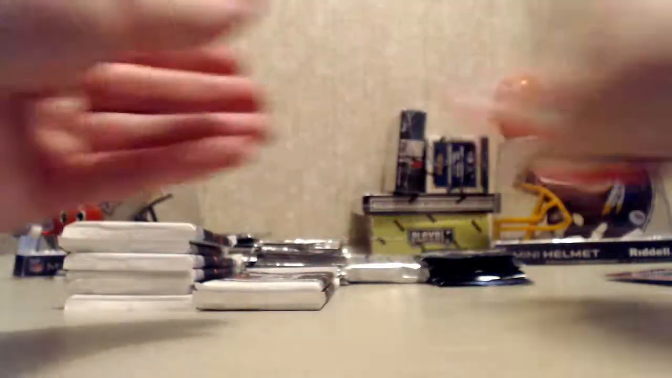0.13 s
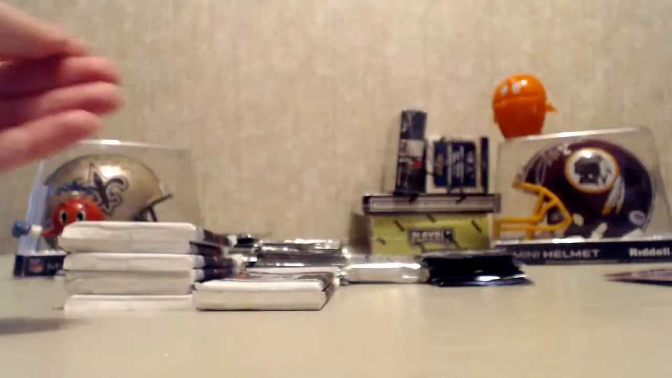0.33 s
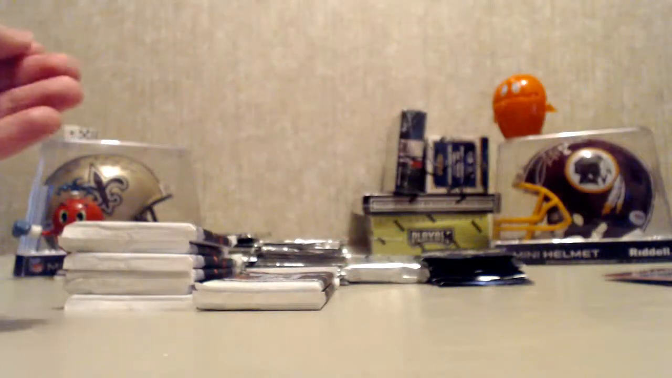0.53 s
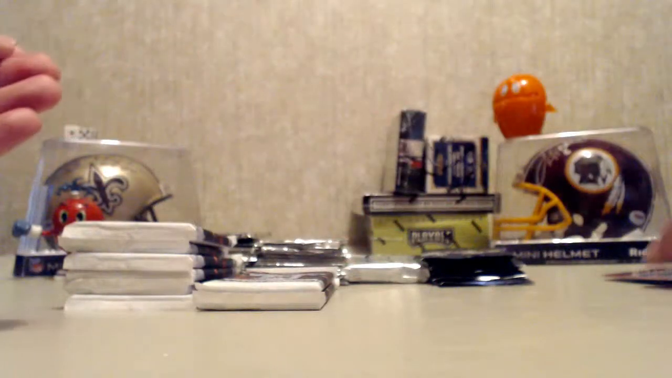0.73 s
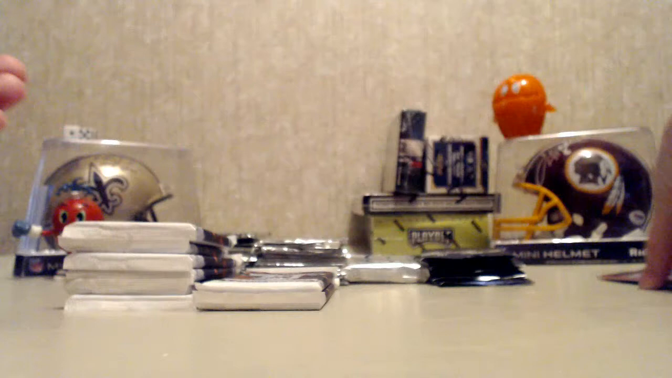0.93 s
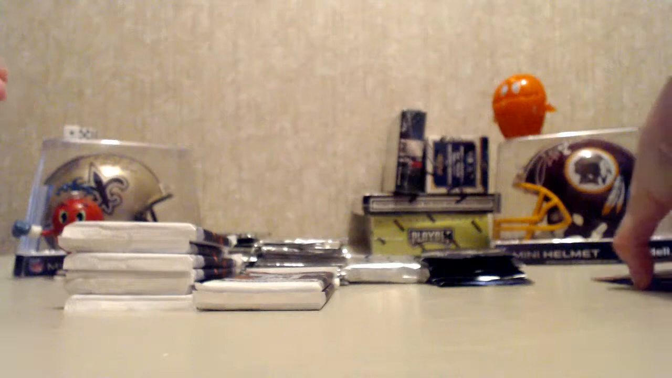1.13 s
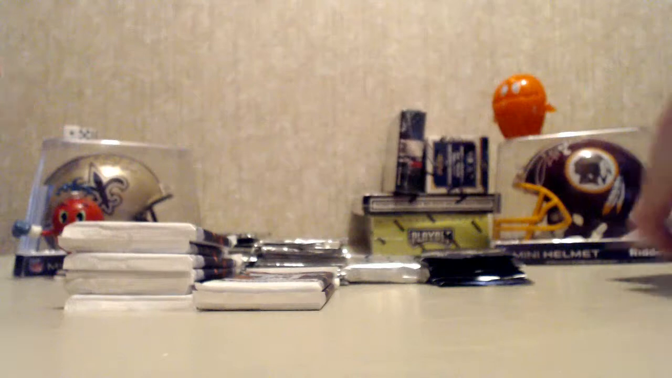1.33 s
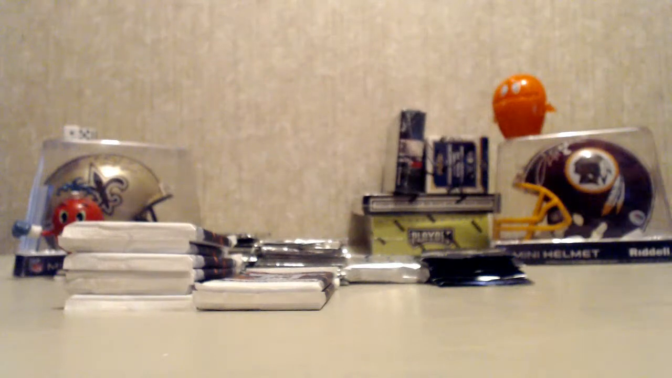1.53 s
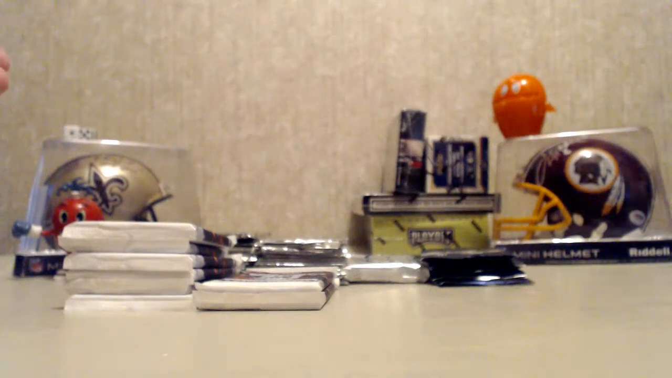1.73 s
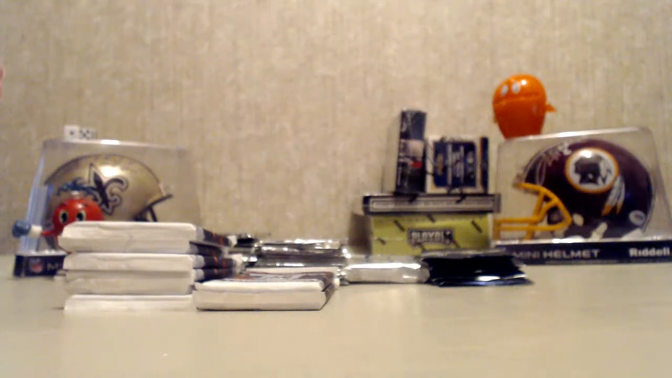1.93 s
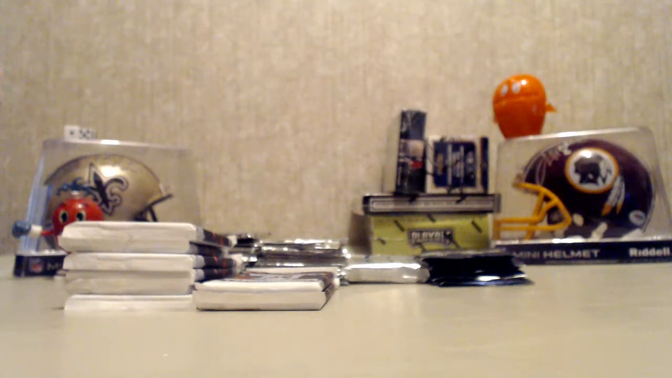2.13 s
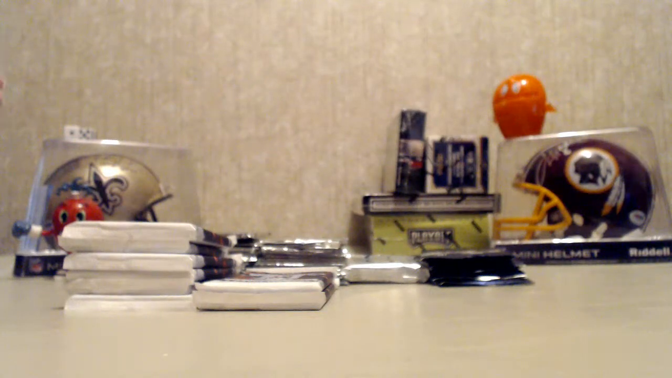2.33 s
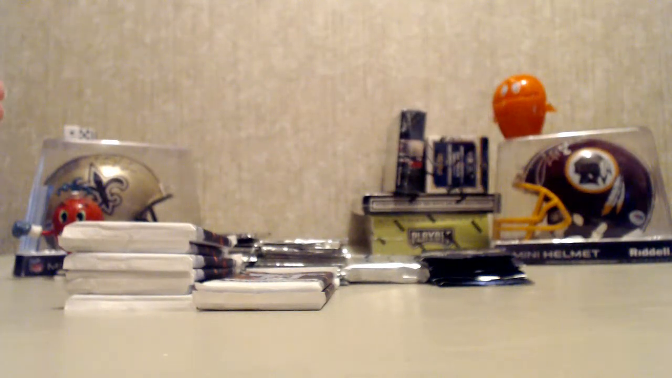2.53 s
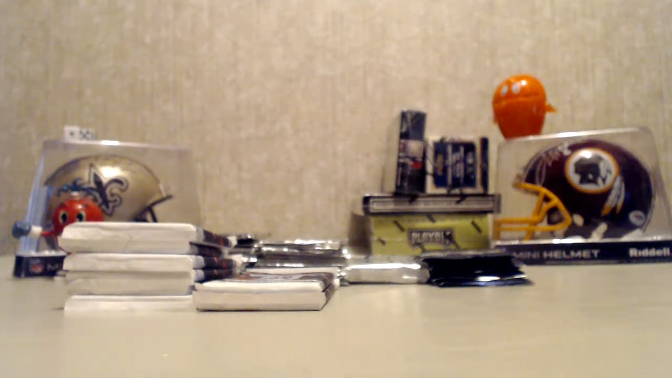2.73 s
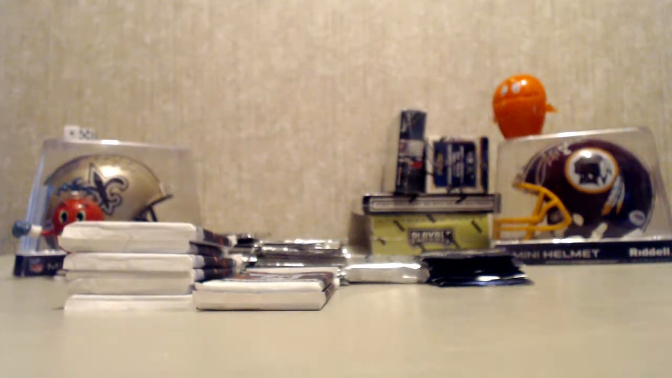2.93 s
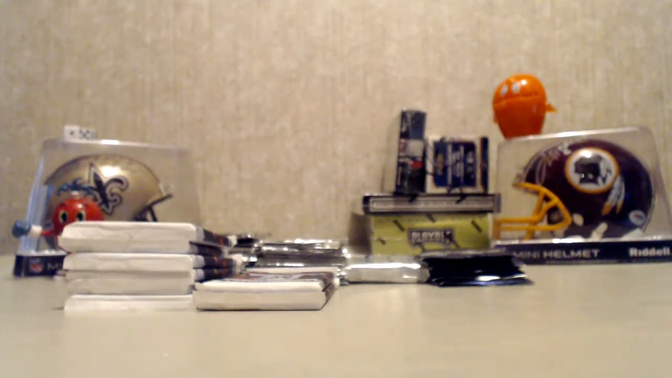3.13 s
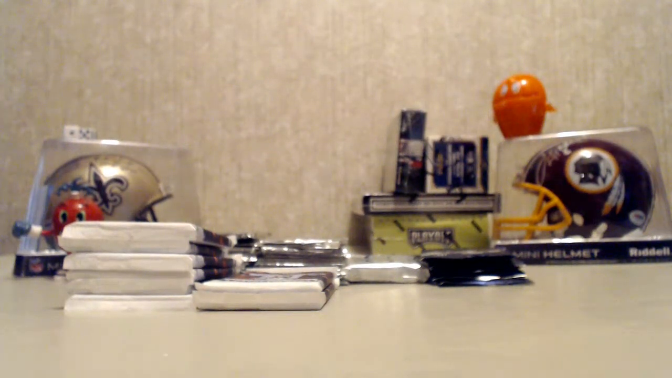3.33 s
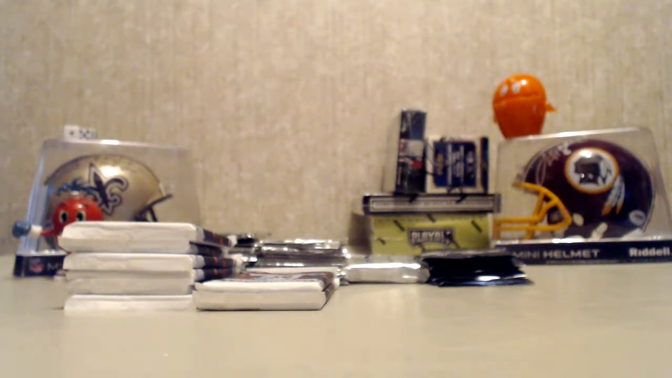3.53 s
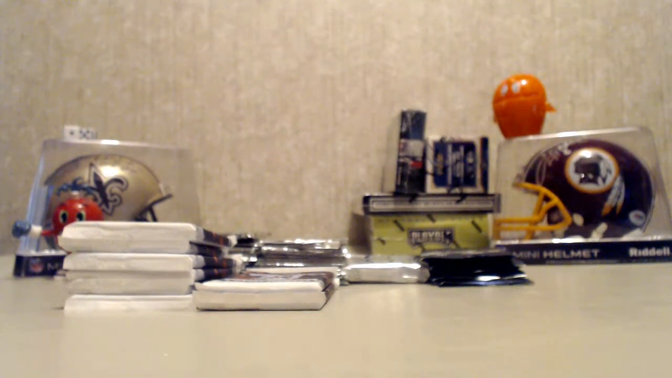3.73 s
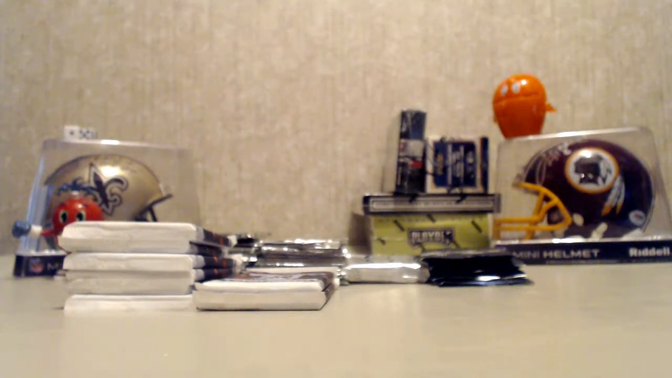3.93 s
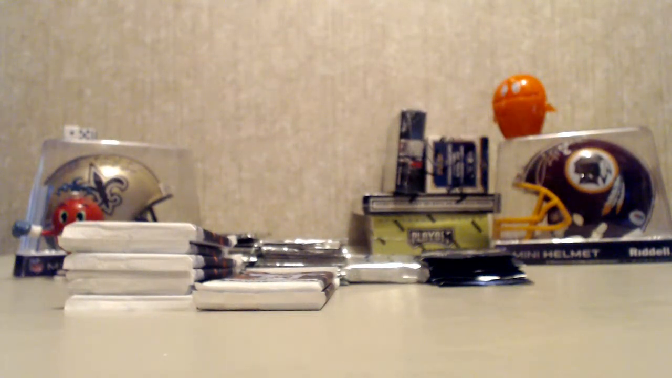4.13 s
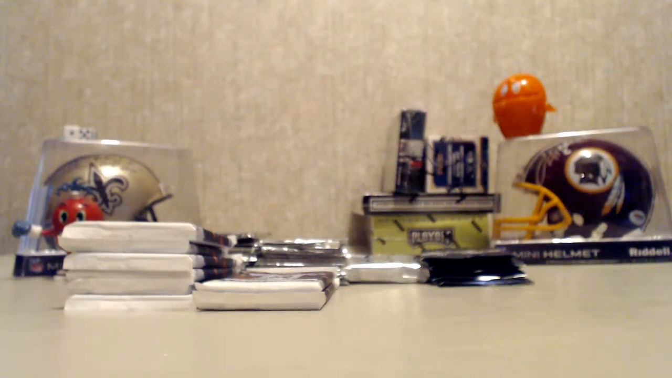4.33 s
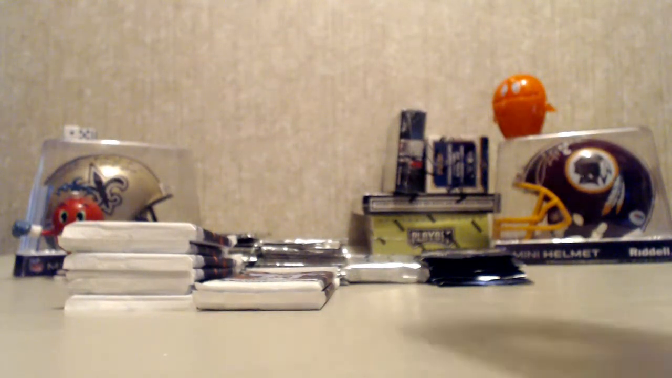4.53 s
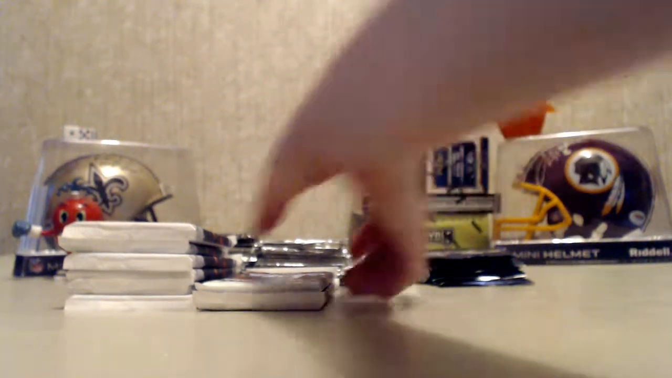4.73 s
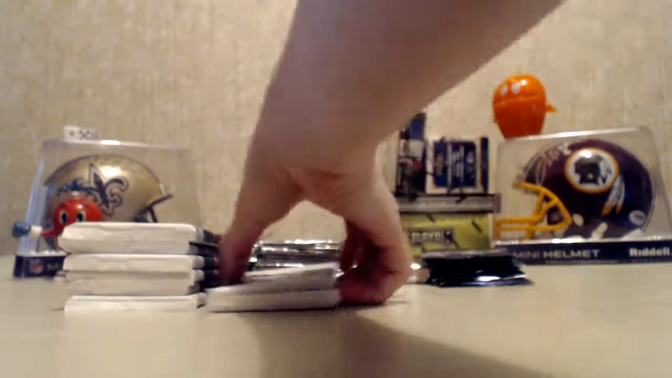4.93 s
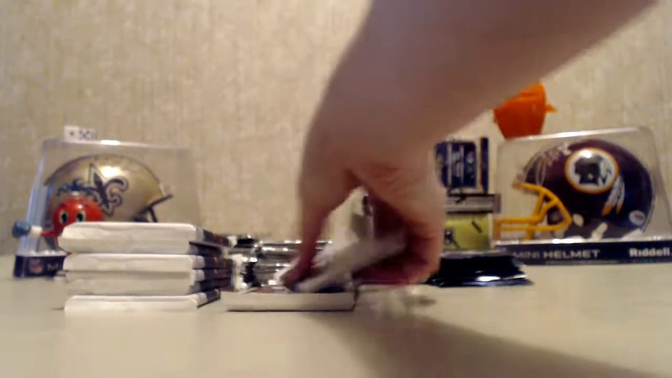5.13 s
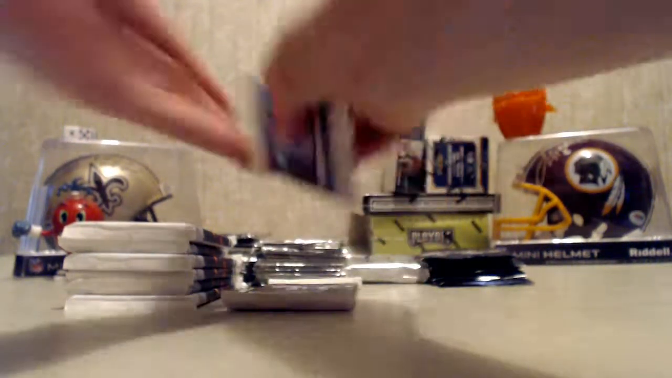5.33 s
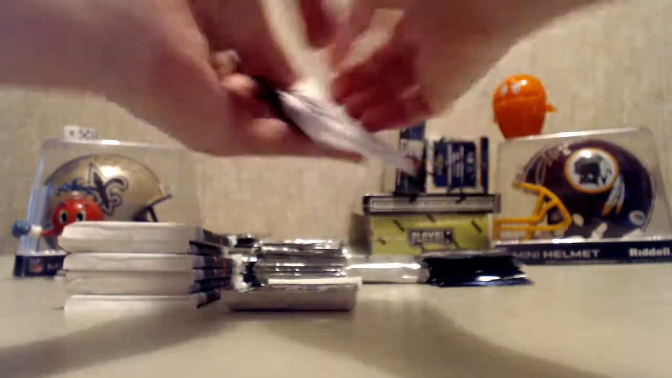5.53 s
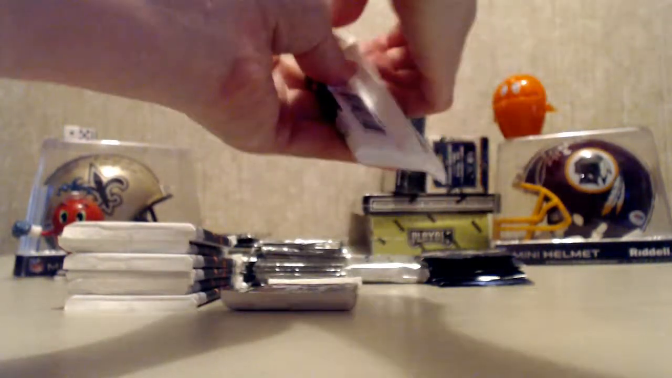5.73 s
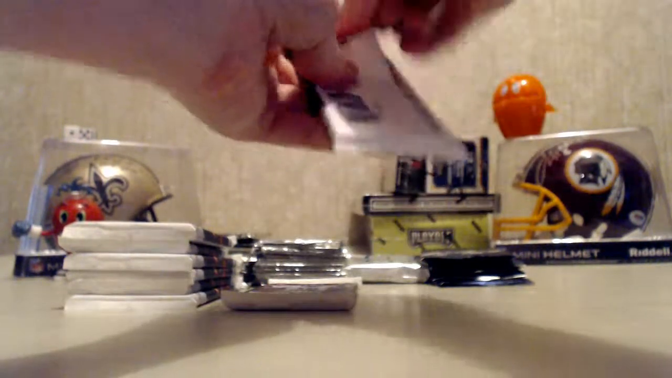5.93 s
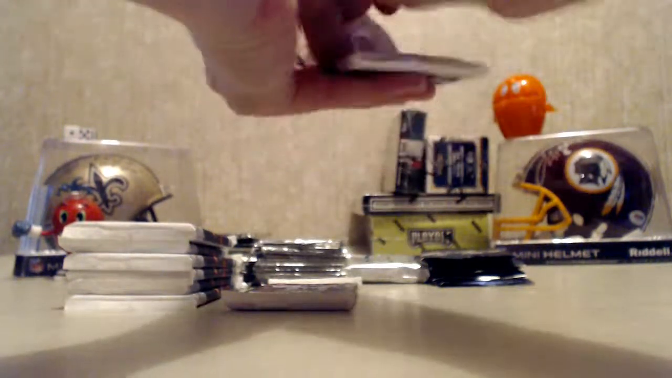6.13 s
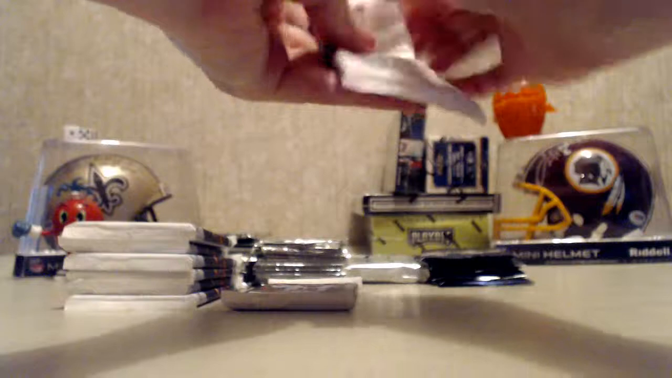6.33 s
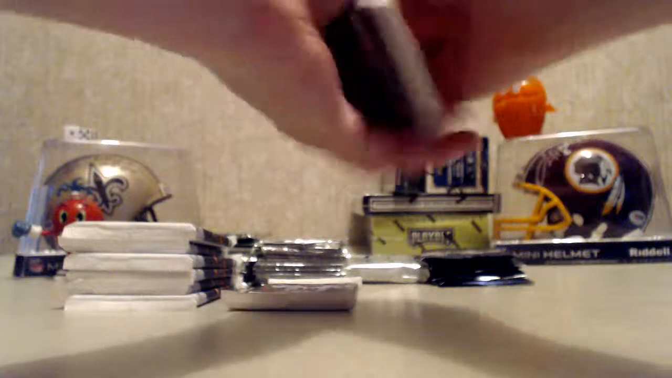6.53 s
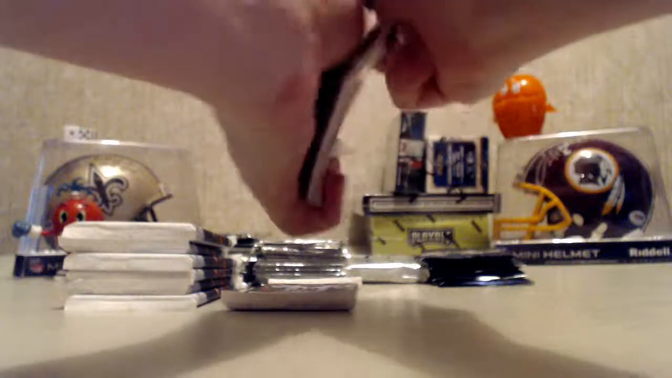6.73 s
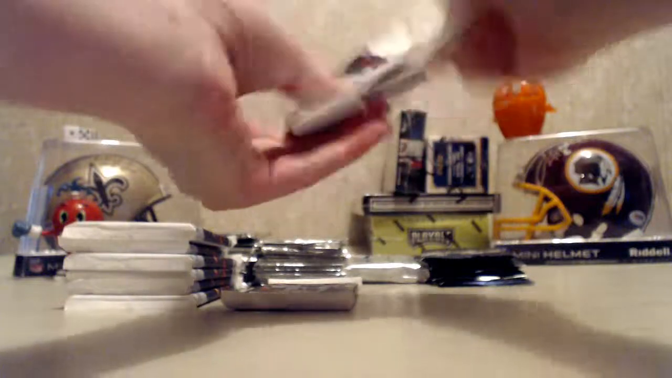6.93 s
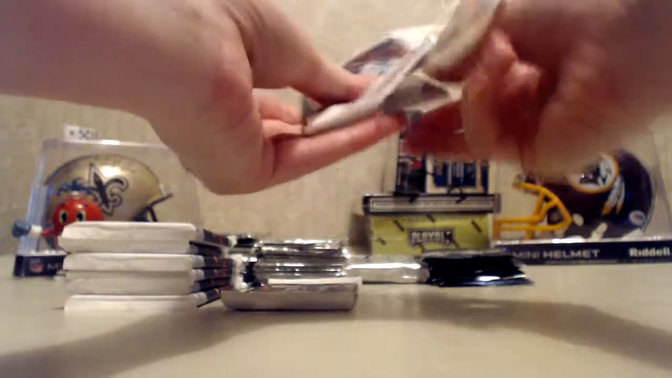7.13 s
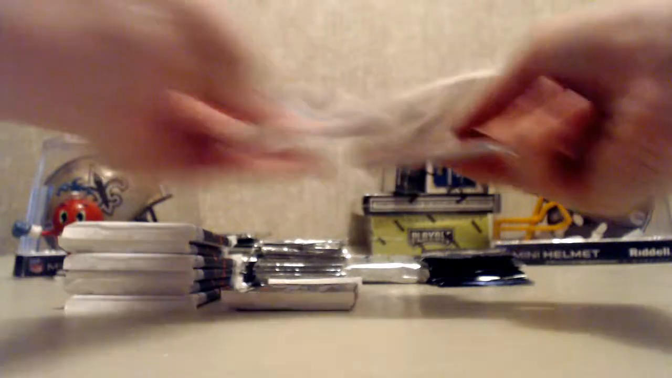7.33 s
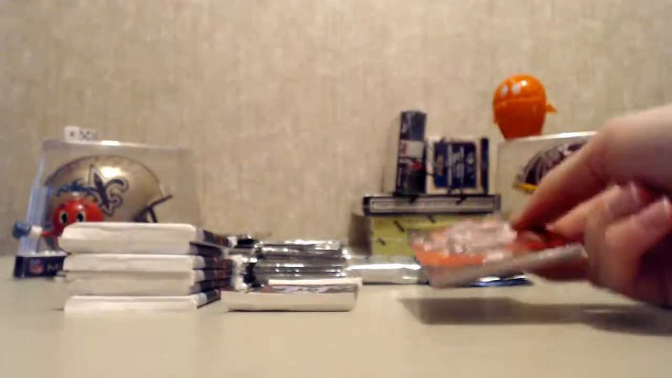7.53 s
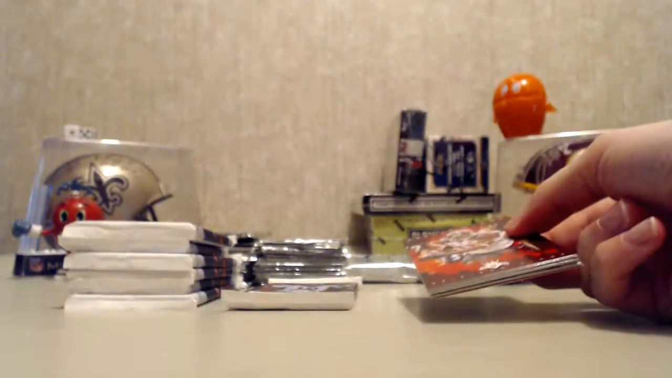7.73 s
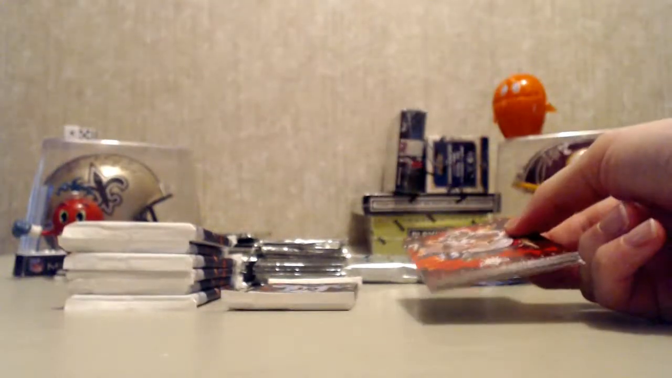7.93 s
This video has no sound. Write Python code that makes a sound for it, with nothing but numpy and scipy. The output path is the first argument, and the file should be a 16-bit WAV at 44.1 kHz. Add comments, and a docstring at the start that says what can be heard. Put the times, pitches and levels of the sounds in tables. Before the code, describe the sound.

Close, dry handling of cards in a quiet room: a few dull taps, a hushed pause, then busy foil crinkling, snapping and rustling.

```python
"""Cards and foil pack at a table

Trading cards are handled close to a small desk microphone in a quiet room. A hand knocks and shifts cards on the
table top, then works cards out of a foil pack: filtered noise and slips rub, pulses ringing flaps snap, and
two loud avalanches of slips crumple the wrapper among fainter ones. Resonant noise squeaks, decaying table modes
thump, and hum, thin whines and coloured noise lie below."""
import sys
import numpy as np
from scipy import signal
from scipy.fft import rfft, irfft, next_fast_len
from scipy.io import wavfile

SR = 44100
rng = np.random.default_rng(int(sys.argv[2]) if len(sys.argv) > 2 else 0)


def pcm_store(signal):
    """Save signal as 16-bit PCM."""
    levels = np.round(np.clip(np.atleast_2d(signal), -1, 1) * 32767)
    wavfile.write(sys.argv[1], SR, levels.astype(np.int16).T)


N = 351918
TIME_S = np.arange(N) / SR

# Source levels are relative: pack, room and peak rounding come after.
# crease snaps and card-edge clicks: (time [s], level [dB], brightness [dB], flap pitch [Hz])
SNAPS = [(0.3178, -27, 3, 1760), (0.3335, -33.5, -27, 600), (0.391, -48.5, -11, 1900),
         (0.9112, -50, -8, 2200), (1.0461, -46, 22, 940), (1.5095, -39.5, -3, 1840),
         (1.5384, -31.5, -29, 603), (1.5478, -45, -1, 1600), (1.847, -47, -10, 1600),
         (1.9148, -46.5, -19, 1120), (2.3812, -50, -4, 844), (2.813, -47.5, -13.5, 1350),
         (4.726, -45, -16, 1200), (4.8789, -35, -12, 1690), (5.1152, -22.5, -6, 1600),
         (5.1156, -24.5, -4.5, 2700), (5.2279, -41.5, 4, 2820), (5.2989, -30.5, -13, 1170),
         (5.3764, -36.5, -1, 1790), (5.4172, -32, 10, 1510), (5.4401, -25, 7, 2900),
         (5.5116, -40, 4.5, 1230), (5.535, -32, -4, 1730), (5.5389, -27, -6, 2270), (5.557, -37, 9, 3210),
         (5.5755, -43, 18, 3000), (5.583, -30.5, 3, 910), (5.5905, -29, 9, 870), (5.6065, -33, 11, 1500),
         (5.616, -26, 10, 3240), (5.6538, -33, -0.5, 1800), (5.666, -28.5, 2, 2600),
         (5.682, -25.5, 1.5, 900), (5.690, -21.5, -0.5, 930), (5.6942, -26, 3, 1150),
         (5.7025, -24.5, -12.5, 1100), (5.7048, -22, 4.5, 1600), (5.713, -21.5, -5.5, 3350),
         (5.717, -22, -8, 980), (5.732, -32.5, 7.5, 1500), (5.7584, -21, 5.5, 3340), (5.7677, -27, 0, 3330),
         (5.796, -30, -0.5, 910), (5.7983, -20.5, -2, 1670), (5.8098, -25, -15.5, 3220),
         (5.8165, -34.5, 2.5, 3100), (5.8324, -20.5, -2.5, 1630), (5.8365, -24.5, 5, 3300),
         (5.8419, -16, 0, 3300), (5.8435, -19.5, -1, 990), (5.8472, -14, -5.5, 1400),
         (5.866, -23, 11.5, 1600), (5.8802, -20.5, 3, 3280), (5.8911, -17, -1.5, 1610),
         (5.8962, -23, 0, 1760), (5.908, -24, 1, 1100), (5.9125, -22.5, -4.5, 3350),
         (5.9432, -25, 2.5, 1600), (5.9696, -25.5, 4.5, 1640), (5.9738, -23, 5.5, 3300),
         (5.9893, -20.5, 0.5, 1550), (6.0351, -15.5, -2, 1400), (6.0544, -14.5, -7, 1620),
         (6.0600, -15.5, 0, 1620), (6.1798, -31.5, -4.5, 950), (6.1926, -19, -1, 2000),
         (6.2098, -21, -4, 1090), (6.2146, -17.5, 11, 1400), (6.2265, -19.5, -5, 1000),
         (6.2318, -35, -16.5, 865), (6.2497, -20, -9, 783), (6.286, -40.5, 12, 3000),
         (6.298, -36.5, -9.5, 950), (6.309, -35, 11.5, 1000), (6.3255, -34.5, -3, 950),
         (6.3531, -34, -2, 1700), (6.3825, -24.5, -4.5, 743), (6.395, -36, 10.5, 1600),
         (6.4163, -24, 2.5, 1310), (6.4461, -25, 5.5, 1710), (6.462, -35.5, -6, 2250),
         (6.4655, -27, -4, 1500), (6.470, -22, -11, 1310), (6.4762, -17, -11, 950),
         (6.4832, -17.5, -10, 650), (6.4836, -16.5, -1, 2320), (6.489, -17.5, -0.5, 1250),
         (6.496, -14, -9.5, 1250), (6.5027, -17, -0.5, 1040), (6.5068, -15.5, -9, 1800),
         (6.514, -20.5, -0.5, 1200), (6.5178, -29, 12, 2400), (6.5247, -22.5, -2, 2290),
         (6.5945, -18.5, 3.5, 970), (6.6487, -34.5, 4, 1500), (6.6847, -27, -2, 3230),
         (6.6974, -21, 1.5, 1150), (6.716, -30, 3, 1200), (6.7268, -29, 2, 806), (6.738, -40, 7, 840),
         (6.7555, -38, -10, 1600), (6.794, -39, 16, 2500), (6.7992, -25, 10, 2470), (6.809, -26, 5, 930),
         (6.826, -27, -15, 1000), (6.832, -22.5, 2, 990), (6.844, -25.5, -9, 850), (6.8471, -21.5, 2, 2400),
         (6.9035, -32.5, 18, 2800), (6.9808, -38, 9, 1680), (6.9971, -33.5, -13, 885),
         (7.025, -34.5, 16, 1900), (7.058, -31.5, 13, 2500), (7.0623, -25, -2, 1510),
         (7.0655, -24, -12, 890), (7.078, -27, 18, 3420), (7.1055, -37, 17, 2200), (7.1453, -33, -10, 1960),
         (7.1955, -31.5, -1, 2300), (7.2045, -27.5, -4, 2070), (7.2155, -31, -1, 1000),
         (7.2356, -28.5, 15, 2200), (7.2442, -27, -6, 990), (7.2589, -30, 10, 2350), (7.283, -27.5, 6, 900),
         (7.2868, -25.5, -14.5, 840), (7.2958, -29.5, -2, 880), (7.3277, -29, 4.5, 1500),
         (7.4221, -29.5, 6.5, 1980), (7.4245, -34.5, -9, 460)]
# many creases or card edges give way together:
# (time [s], length [s], level [dB], brightness [dB], air-pocket pitch [Hz])
CRUMPLES = [(.3185, .018, -36.5, -4, 420), (1.045, .012, -47.5, 5, 950), (1.510, .008, -49, 3, 900),
            (1.548, .008, -48.5, -1, 850), (4.752, .012, -45, 5, 750), (6.0093, .0115, -11, 0, 690),
            (6.021, .008, -21, 9, 1300), (6.5597, .0105, -10.5, 0, 1200), (6.57, .009, -21, 6, 1150)]
# one push of the fingers into the foil: (time [s], length [s], level [dB], brightness [dB])
SCRUNCHES = [(4.739, 0.023, -48.5, 1.5), (4.865, 0.15, -48, 5), (5.301, 0.022, -40, -5.5),
             (5.406, 0.051, -42, 2), (5.578, 0.045, -35, 0), (5.674, 0.03, -28.5, 2),
             (5.788, 0.17, -38.5, 3), (5.956, 0.083, -31.5, 13.5), (6.182, 0.05, -39, 3),
             (6.295, 0.033, -39, -4.5), (6.37, 0.05, -42.5, -3.5), (6.472, 0.037, -23.5, 0.5),
             (6.558, 0.084, -34.5, -2), (6.679, 0.05, -39, -0.5), (6.824, 0.05, -31, -3),
             (6.883, 0.046, -43, -4), (6.99, 0.035, -40, -5), (7.054, 0.04, -35, -1),
             (7.112, 0.034, -38.5, -6), (7.196, 0.045, -35.5, -6), (7.271, 0.014, -38, -6.5),
             (7.417, 0.018, -40, -3)]
# pack sliding between the fingers: (time [s], level before the slide gain [dB])
SLIDING = [(4.74, -62.5), (4.95, -53), (5.26, -62), (5.361, -49), (5.511, -53.5), (5.62, -41), (5.98, -43),
           (6.1, -50.5), (6.36, -50.5), (6.522, -27.5), (6.67, -56), (6.82, -36), (6.959, -59),
           (7.088, -49), (7.38, -47.5), (7.55, -65.5)]
# card or pack gliding over the table: (middle [s], half-width [s], level [dB], brightness [dB])
GLIDES = [(0.082, 0.023, -70.5, -6.5), (0.306, 0.024, -55.5, -1), (0.759, 0.059, -56, -2.5),
          (0.866, 0.038, -62, -1.5), (0.983, 0.061, -61.5, -6), (1.152, 0.022, -62, 11.5),
          (1.493, 0.019, -58.5, 0), (1.562, 0.039, -56.5, -8.5), (1.72, 0.054, -62, -3),
          (1.843, 0.036, -55.5, -2.5), (1.976, 0.027, -62.5, -4), (2.104, 0.072, -63.5, 1.5),
          (2.21, 0.017, -64.5, -1), (2.48, 0.04, -55.5, -11.5), (2.604, 0.13, -63.5, -4),
          (4.324, 0.14, -66.5, -4), (4.756, 0.021, -48, 0.5), (4.917, 0.19, -53, -0.5),
          (5.095, 0.053, -45, 5), (7.534, 0.33, -61.5, -6), (7.752, 0.033, -54.5, -3),
          (7.877, 0.027, -61, -2)]
# a sliding surface sticks and scuffs or squeaks, or a short knock or tap rings: (time [s], length [s], pitch
# [Hz], width of the first resonance [Hz], level [dB])
SQUEAKS = [(0.068, 0.02, 297, 300, -57.5), (0.313, 0.027, 586, 450, -44.5),
           (0.444, 0.014, 1010, 496, -54.5), (0.703, 0.12, 175.9, 158, -58.5),
           (1.639, 0.031, 204, 132, -58), (1.551, 0.025, 1680, 600, -63), (1.819, 0.019, 1040, 600, -55),
           (1.839, 0.011, 1650, 200, -51), (1.841, 0.014, 4020, 900, -59), (2.079, 0.05, 600, 500, -62.5),
           (2.11, 0.018, 1710, 120, -65), (2.444, 0.0084, 580, 400, -56.5), (4.725, 0.012, 990, 450, -54),
           (4.932, 0.09, 6030, 600, -53), (4.941, 0.014, 820, 400, -57.5), (4.943, 0.017, 436, 194, -40),
           (5.688, 0.0051, 925, 250, -26.5), (5.93, 0.0074, 3260, 255, -34.5),
           (6.023, 0.007, 4950, 700, -24.5), (6.223, 0.04, 850, 400, -44), (6.381, 0.0083, 666, 250, -36),
           (6.611, 0.02, 7340, 676, -32), (6.612, 0.022, 5980, 503, -29), (6.616, 0.016, 2220, 350, -28.5),
           (6.692, 0.012, 1120, 302, -36), (6.701, 0.022, 815, 250, -42.5), (6.726, 0.016, 660, 220, -38),
           (7.24, 0.0068, 456, 248, -37.5), (7.288, 0.0085, 720, 404, -41), (7.456, 0.051, 1330, 250, -60),
           (7.472, 0.087, 1900, 463, -62), (7.803, 0.02, 271.5, 71.4, -50.5)]
# resonances of the cupped pack: (mean pitch [Hz], width [Hz], level [dB])
PACK = [(580, 36, -14), (775, 12, -4), (943, 7.3, -11.5), (1110, 8.3, -8), (1338, 34, -11.5),
        (1620, 59, -9), (2155, 37, -6.5), (2730, 31, -14), (3340, 22, -8), (4805, 39, -0.5), (5140, 55, -6),
        (5600, 45, -4), (5980, 46, -13)]
# soft blows, on the table top or on the held pack: (time [s], level [dB], contact pitch [Hz])
THUMPS = [(0.32, -27.5, 322), (0.335, -29.5, 238), (0.351, -30.5, 64), (0.686, -34.5, 142),
          (0.718, -29.5, 71), (0.765, -37, 134), (0.783, -34, 78.5), (0.915, -44, 171), (1.096, -44, 111),
          (1.516, -37, 90), (1.538, -43, 460), (1.545, -33.5, 225), (1.65, -36, 89), (4.691, -28.5, 78),
          (4.748, -37, 60), (4.866, -36, 375), (5.3, -31.5, 220), (6.01, -23, 248), (6.233, -32, 243),
          (6.251, -32.5, 254), (6.482, -23, 201), (6.83, -37.5, 197), (6.563, -18, 115),
          (6.566, -16.5, 257), (7.061, -34.5, 184), (7.239, -34.5, 123), (7.423, -36.5, 232)]
# a hand leans on the table or drags over it: (time [s], length [s], level [dB])
SHOVES = [(0.316, 0.033, -37), (0.699, 0.068, -43.5), (0.826, 0.32, -57.5), (1.502, 0.061, -46),
          (1.633, 0.11, -48), (1.81, 0.33, -59.5), (4.684, 0.058, -52.5), (4.816, 0.12, -56.5)]
# table-top modes: (pitch [Hz], nominal level [dB], decay by 60 dB [s])
TABLE = [(60, -10.5, 0.059), (115, -3.5, 0.087), (169.6, -4.5, 0.059), (227, -14.5, 0.034)]
# colour of a crease: (frequency [Hz], density [dB])
CREASE = [(120, -4.5), (300, 1.5), (600, 2.5), (900, 1.5), (1500, 0), (2500, -3), (4000, -4), (6000, -2),
          (7300, -3), (8300, -17.5), (9200, -33.5)]
# colour of sliding: (frequency [Hz], density [dB])
SLIDE = [(120, 0), (300, 1.5), (600, -1), (1000, 0), (1700, 4), (2700, -1.5), (4200, 3), (6000, 4.5),
         (7300, 0.5), (8300, -11), (9200, -36.5)]
# colour of room and microphone noise: (frequency [Hz], relative density [dB])
FLOOR = [(15, -20), (24, -5), (65, -4.5), (90, -18.5), (123, -16), (205, -19.5), (285, -18), (647, -30),
         (1300, -33.5), (3970, -53.5), (5400, -53.5), (7900, -57), (8500, -74), (9200, -87), (11000, -100)]
# hum and electrical whines: (pitch [Hz], level [dB], pitch-wander setting [Hz])
HUM = [(123, -65.5, 1.9), (1200, -78.5, 4.1), (1400, -76.5, 1.7), (5474, -79.5, 25)]

FLOOR_DB = -55.45
BUZZ_HZ, BUZZ_PER_S, BUZZ_DB = 7990, 30, -93.5
STOPBAND_EDGE_HZ = 9600
BODY_HZ, FLAP_HZ, EDGE_HZ, TOP_HZ = 150, 900, 3500, 10000  # register limits
REGISTER_BANDS_HZ = [(BODY_HZ, FLAP_HZ), (FLAP_HZ, EDGE_HZ), (EDGE_HZ, TOP_HZ)]
REGISTER_FILTERS = [signal.butter(3, band, "band", fs=SR, output="sos") for band in REGISTER_BANDS_HZ]
# (body, edge) against the flaps at zero brightness; snaps lose more body as pitch rises
SNAP_BALANCE_DB, CRUMPLE_BALANCE_DB, RUB_BALANCE_DB = (-13, -4.5), (-2.3, -3), (-4, 0)
BODY_LOSS_DB_PER_OCTAVE = 9
# rate is per unit of buckling, which reaches 0.5 at most
SMALL_SNAPS_PER_S_PER_BUCKLING, SMALL_SNAP_ABOVE_RUB_DB, SMALL_SNAP_MEDIAN_HZ = 150, 0.5, 1600
SCRUNCH_ATTACK_S, SCRUNCH_SAG_DB_PER_S, SCRUNCH_RELEASE_S = 0.0042, 30.5, 0.016
GRIP_CHANGES_PER_S, GRIP_SHIFT_OCTAVES = 6, 0.025


def snaps(rows, flutter=0.38, flutter_s=0.0012, body_hz=420, body_width_hz=300, body_ring=1.3,
          flap_damping=0.3, broad=0.21, overtone_db=-11.5, edge_width_hz=600, edge_ring=0.98):
    """A crease flips with a pulse and short flutter; card stack, flap and ridge ring, low flaps longest."""
    out, t = np.zeros(N), np.arange(1024) / SR
    reference = np.sqrt(.003 * SR / len(t))  # level refers to 3 ms of sound
    ridges_hz = rng.uniform(3800, 7200, len(rows))
    overtones = rng.uniform(1.6, 2.6, len(rows))
    noises = rng.standard_normal((len(rows), len(t)))
    for (s, db, bright_db, hz), ridge_hz, overtone, noise in zip(rows, ridges_hz, overtones, noises):
        pulse = flutter * noise * np.exp(-t / flutter_s)
        pulse[0] = 2 * np.sign(noise[0])
        pulse = coloured(pulse, CREASE)
        width_hz = flap_damping * hz
        body, flap, edge = registers(pulse)
        body = body + body_ring * resonance(body, body_hz, body_width_hz)
        ring = resonance(resonance(pulse, hz, width_hz), hz, hz)
        flap = broad * flap + ring + from_db(overtone_db) * resonance(flap, overtone * hz, width_hz)
        edge = edge + edge_ring * resonance(edge, ridge_hz, edge_width_hz)
        body_db = SNAP_BALANCE_DB[0] - BODY_LOSS_DB_PER_OCTAVE * np.log2(hz / FLAP_HZ)
        gains = register_gains(db, bright_db, (body_db, SNAP_BALANCE_DB[1]))
        sound = sum(gain * rms_one(part) for gain, part in zip(gains, (body, flap, edge)))
        add(out, s - .0002, reference * sound)
    return out


def small_snaps(work, spread_db=3.0, bright_db=5.5, bright_spread_db=8.0, spread_octaves=0.91):
    """Random rows of lesser snaps: harder pressing brings more and louder ones, a light slide almost none."""
    tries = 2000
    moments, chances = rng.random((tries, 2)).T
    at = (moments * N).astype(int)
    giving = buckling(work[:, at], threshold_db=-44.0, softness_db=1.5)
    happens = chances < SMALL_SNAPS_PER_S_PER_BUCKLING * N / SR / tries * giving
    rub_db = 20 * np.log10(np.linalg.norm(work[:, at], axis=0))
    loud, bright, pitch = np.clip(rng.standard_normal((tries, 3)), -2, 2).T
    level_db = rub_db + SMALL_SNAP_ABOVE_RUB_DB + spread_db * loud
    flap_hz = SMALL_SNAP_MEDIAN_HZ * 2 ** (spread_octaves * pitch)
    return np.column_stack([at / SR, level_db, bright_db + bright_spread_db * bright, flap_hz])[happens]


def crumples(per_s=6000, fall_s=0.0024, pop_s=0.0038, pop_db=5.5):
    """The air in the wrapper pops, and the big crease sets off an avalanche of others."""
    out, t = np.zeros(N), np.arange(2048) / SR
    for s, length_s, db, bright_db, hz in CRUMPLES:
        burst = slips(len(t), per_s, spread_db=1) * gate(t, length_s, .0001, fall_s)
        burst[0] = .3 * np.linalg.norm(burst)  # the big crease
        gains = register_gains(db, bright_db, CRUMPLE_BALANCE_DB)
        parts = registers(coloured(burst, CREASE))
        avalanche = sum(gain * rms_one(part) for gain, part in zip(gains, parts))
        add(out, s, np.sqrt(length_s * SR / len(t)) * avalanche)
        add(out, s, from_db(db + pop_db) * np.sin(2 * np.pi * hz * t) * np.exp(-t / pop_s))
    return out


def rubbing(work, per_s=800, tick_per_s=110, ticks=0.85, facet_width_hz=260, grain=0.97, judder_per_s=160):
    """A light slide hisses; pressed harder the foil buckles: slips ring small facets, wrinkles tick."""
    facets_hz = np.geomspace(450, 7500, 24)
    clicks = slips(N, per_s, spread_db=3.5)
    dealt = rng.integers(0, len(facets_hz), N)  # each slip strikes one facet
    facets = sum(resonance(clicks * (dealt == k), hz, facet_width_hz) * np.sqrt(hz)
                 for k, hz in enumerate(facets_hz))
    wrinkles = slips(N, tick_per_s, spread_db=-2.0)
    grains = rms_one(1.8 * rms_one(clicks) + rms_one(facets) + ticks * rms_one(wrinkles))
    pressure = buckling(work, threshold_db=-50.0)
    share = np.clip(grain * pressure, 0, 1)
    friction = np.sqrt(share) * grains + np.sqrt(1 - share) * rng.standard_normal(N)
    judder_db = (2.0 + 1.5 * pressure) * unsteady(judder_per_s)
    friction = coloured(friction * from_db(judder_db), SLIDE)
    return sum(strength * rms_one(part) for strength, part in zip(work, registers(friction)))


def finger_work(slide_gain_db=0.5, slide_bright_db=0.0, rest_db=-72.5):
    """Friction strength in body, flaps and edges: a lasting slide, with the power of glides and scrunches added."""
    s, db = np.transpose(SLIDING)
    slide = from_db(np.interp(TIME_S, s, db + slide_gain_db, left=rest_db, right=rest_db))
    power = np.outer(register_gains(0, slide_bright_db, RUB_BALANCE_DB), slide) ** 2
    t = np.arange(SR // 2) / SR
    middle = t.mean()
    moves = []
    for s, half_width_s, db, bright_db in GLIDES:
        swell = np.exp(-2 * ((t - middle) / half_width_s) ** 2)
        moves.append((s - middle, swell, db, bright_db))
    for s, length_s, db, bright_db in SCRUNCHES:
        push = gate(t, length_s, SCRUNCH_ATTACK_S, SCRUNCH_RELEASE_S) * from_db(-SCRUNCH_SAG_DB_PER_S * t)
        moves.append((s, push, db, bright_db))
    for s, envelope, db, bright_db in moves:
        for register, gain in zip(power, register_gains(db, bright_db, RUB_BALANCE_DB)):
            add(register, s, (gain * envelope) ** 2)
    return np.sqrt(power)


def buckling(work, threshold_db, softness_db=1.0):
    """How far the foil gives under the fingers: 0 to 0.5, a third at the threshold."""
    return 1 / (2 + np.exp((threshold_db - 20 * np.log10(work[1])) / softness_db))


def cupped_pack(x, level_db=-2.5):
    """The pack held between the hands favours a few pitches, which shift as it bends."""
    rings = np.zeros(N)
    for hz, width_hz, db in PACK:
        moving_hz = hz * 2 ** (GRIP_SHIFT_OCTAVES * unsteady(GRIP_CHANGES_PER_S))
        rings += from_db(db) * wandering_resonance(x, moving_hz, width_hz)
    return from_db(level_db) * (x + rings)


def squeaks(rise_share=0.089, fall_share=0.089):
    """Friction briefly feeds a narrow resonance; longer scuffs swell and fade more gently."""
    out, t = np.zeros(N), np.arange(SR // 5) / SR
    for s, length_s, hz, width_hz, db in SQUEAKS:
        envelope = gate(t, length_s, rise_share * length_s, fall_share * length_s)
        friction = rng.standard_normal(len(t)) * envelope
        tone = resonance(resonance(friction, hz, width_hz), hz, 2 * width_hz)
        add(out, s, from_db(db) * rms_one(tone) * np.sqrt(length_s * SR / len(t)))
    return out


def thumps(cycles=0.97):
    """A soft contact swings about once; the low modes of the table ring on."""
    out, t = np.zeros(N), np.arange(SR // 4) / SR
    for (s, db, hz), luck in zip(THUMPS, rng.standard_normal((len(THUMPS), len(TABLE)))):
        age = 2 * t * hz / cycles
        push = -np.sin(2 * np.pi * hz * t) * age * np.exp(1 - age)
        ring = np.zeros(len(t))
        for (mode_hz, mode_db, t60_s), own in zip(TABLE, luck):
            decay = from_db(mode_db + 2 * own - 60 * t / t60_s)
            ring += decay * np.sin(2 * np.pi * mode_hz * t) / (1 + (mode_hz / hz) ** 2)
        add(out, s, from_db(db) * (push - ring))
    return out


def rumble(work, shove_rise_s=0.012, shove_fall_s=0.033, skin_cut_hz=220, handling_db=-59.5, full_push_db=-53.5):
    """Shoves stir the low modes of the table; finger work reaches them faintly through the arms."""
    jostle, t = rng.standard_normal(N), np.arange(SR // 2) / SR
    jostle = signal.sosfilt(signal.butter(2, skin_cut_hz, fs=SR, output="sos"), jostle)
    modes = sum(from_db(db) * resonance(jostle, hz, 6 / t60_s) for hz, db, t60_s in TABLE)
    strength = from_db(handling_db + np.minimum(20 * np.log10(work[0]) - full_push_db, 0))
    for s, length_s, db in SHOVES:
        add(strength, s, from_db(db) * gate(t, length_s, shove_rise_s, shove_fall_s))
    return strength * rms_one(modes)


def room(x, near_db=-12.0, near_s=0.0071, far_db=-19.5, t60_s=0.12, moves_per_s=4):
    """Dense reflections from table and boxes, then a faint tail; the pattern changes as the hands move."""
    t, out = np.arange(SR // 3) / SR, x
    place = np.pi * unsteady(moves_per_s)
    for share in (np.cos(place), np.sin(place)):  # blend two echo patterns
        near = rng.standard_normal(len(t)) * np.exp(-t / near_s) * (t > .002)
        far = rng.standard_normal(len(t)) * np.exp(-np.log(1000) * t / t60_s) * (t > .009)
        echoes = (from_db(near_db) * rms_one(near) + from_db(far_db) * rms_one(far)) / np.sqrt(len(t))
        out = out + signal.fftconvolve(share * x, echoes)[:N]
    return out


def background():
    """Low room noise, a faint pulsing tone, hum and thin whines whose phase drifts at random."""
    out = from_db(FLOOR_DB) * rms_one(coloured(rng.standard_normal(N), FLOOR))
    pulsing = np.maximum(np.sin(2 * np.pi * BUZZ_PER_S * TIME_S), 0)
    out = out + from_db(BUZZ_DB) * rms_one(pulsing * np.sin(2 * np.pi * BUZZ_HZ * TIME_S))
    for hz, db, wander_hz in HUM:
        wander = np.cumsum(rng.standard_normal(N)) * np.sqrt(np.pi * wander_hz / SR)
        tone = np.sin(2 * np.pi * hz * TIME_S + wander)
        out = out + from_db(db) * rms_one(resonance(tone, hz, 10 + 2 * wander_hz))
    return out


def from_db(db):
    """Decibels to gain."""
    return 10 ** (np.asarray(db) / 20)


def rms_one(x):
    """Scale to unit power."""
    return x / np.sqrt(np.mean(x ** 2) + 1e-20)


def add(out, s, sound):
    """Mix a sound in at time s."""
    at = max(round(s * SR), 0)
    out[at:at + len(sound)] += sound[:max(N - at, 0)]


def coloured(x, spectrum):
    """Give a signal a spectrum with a causal (minimum-phase) filter."""
    size = 2 * next_fast_len(len(x))
    hz, db = np.transpose(spectrum)
    grid_hz = np.maximum(np.arange(size // 2 + 1) * SR / size, 1)
    cepstrum = irfft(np.log(from_db(np.interp(np.log(grid_hz), np.log(hz), db))))
    cepstrum[1:size // 2] *= 2  # fold onto positive time
    cepstrum[size // 2 + 1:] = 0
    return irfft(rfft(x, size) * np.exp(rfft(cepstrum)))[:len(x)]


def registers(x):
    """Split into the dull body of the pack, its flexing flaps and the sharp crease edges."""
    return [signal.sosfilt(sos, x + 1e-18) for sos in REGISTER_FILTERS]


def register_gains(db, bright_db, balance_db):
    """Share a level among body, flaps and edges; brightness tips it from the body towards the edges."""
    shares = from_db([balance_db[0] - bright_db, 0, balance_db[1] + bright_db])
    return from_db(db) * shares / np.linalg.norm(shares)


def resonance(x, hz, width_hz):
    """Two-pole resonance with gain about 1 on top."""
    r = np.exp(-np.pi * width_hz / SR)
    feed = np.array([1, 0, -1]) * (1 - r * r) / 2
    return signal.lfilter(feed, [1, -2 * r * np.cos(2 * np.pi * hz / SR), r * r], x + 1e-18)


def wandering_resonance(x, hz, width_hz):
    """Resonance with gain about 1 on top whose centre follows the curve hz: shift down, smooth, shift back."""
    turn = np.exp(2j * np.pi * np.cumsum(hz) / SR)
    r = np.exp(-np.pi * width_hz / SR)
    return 2 * np.real(turn * signal.lfilter([1 - r], [1, -r], x / turn + 1e-18))


def slips(size, per_s, spread_db):
    """Random tiny slips of either sign; strength in dB spreads exponentially up or down from 0 by spread_db."""
    strength = from_db(spread_db * np.minimum(rng.exponential(1, size), 4))
    return (rng.random(size) < per_s / SR) * strength * rng.choice([-1, 1], size)


def gate(t, length_s, rise_s, fall_s):
    """Quick rise, hold, exponential fall."""
    return (1 - np.exp(-t / rise_s)) * np.exp(-np.maximum(t - length_s, 0) / fall_s)


def unsteady(per_s):
    """Random curve of rms 1 with per_s new targets a second, joined by straight lines."""
    knots = rng.standard_normal(4096)
    return rms_one(np.interp(TIME_S * per_s, np.arange(len(knots)), knots))


def scene():
    """Wrapper and cards sound through the room; the table carries its thumps straight to the microphone."""
    work = finger_work()
    crackle = snaps(small_snaps(work), flap_damping=0.16, edge_ring=3.0)
    wrapper = cupped_pack(snaps(SNAPS) + crumples() + rubbing(work) + crackle) + squeaks()
    return (room(wrapper) + thumps() + rumble(work) + background())[None]


def record(dry):
    """The loudest peaks are rounded and the top is cut."""
    ceiling = .62
    rounded = ceiling * np.tanh(dry / ceiling)
    return signal.sosfilt(signal.cheby2(14, 50, STOPBAND_EDGE_HZ, fs=SR, output="sos"), rounded)


dry = scene()
out = record(dry)
pcm_store(out)
```